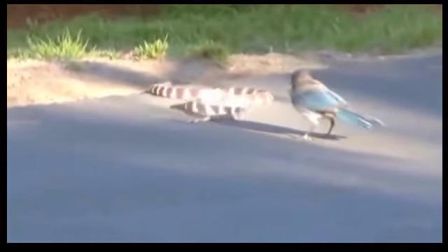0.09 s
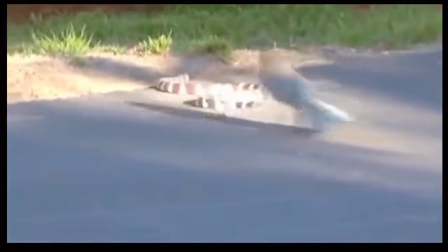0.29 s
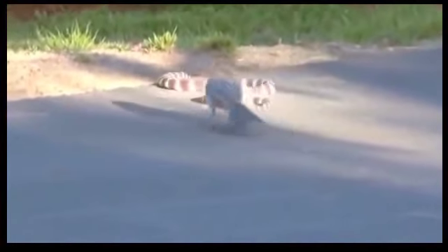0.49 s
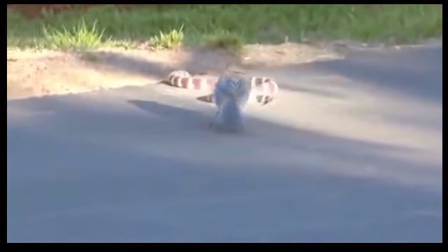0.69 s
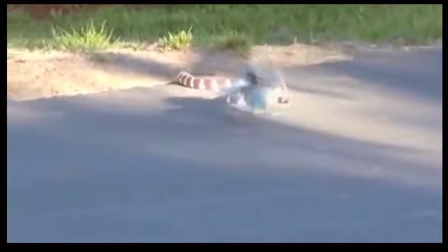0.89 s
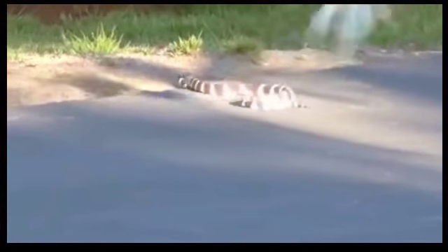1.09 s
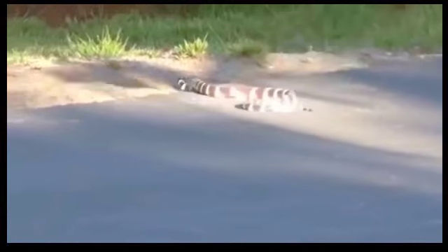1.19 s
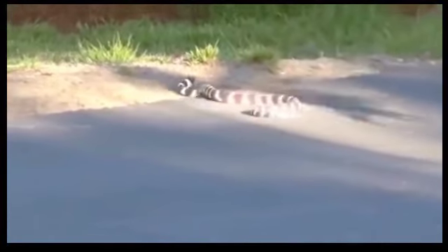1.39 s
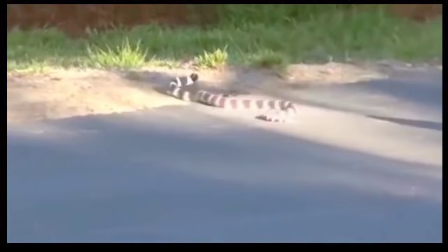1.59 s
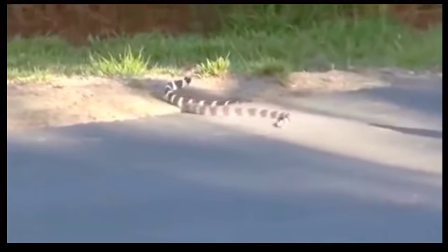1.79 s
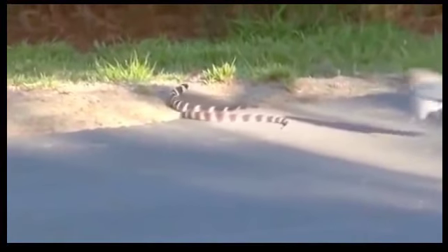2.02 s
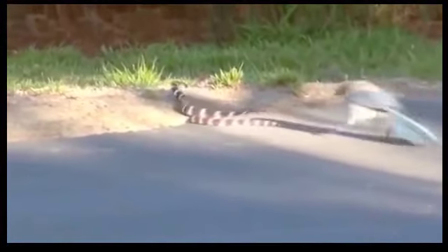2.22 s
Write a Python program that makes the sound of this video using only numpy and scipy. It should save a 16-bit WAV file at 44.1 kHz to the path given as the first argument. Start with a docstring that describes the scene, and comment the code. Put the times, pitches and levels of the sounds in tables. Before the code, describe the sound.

A jay's raspy rising call, twice, with a loud bill click and soft wing beats.

```python
"""A jay mobs a snake on a paved garden path, heard on a stereo microphone over a steady, distant hush.
Its bill snaps once, then a harsh, rising scold comes from a little right of centre, with a second, much
louder snap inside it. Soft wing beats follow as the bird jumps clear, and light air brushes the
microphone. Near the end it scolds again. Each call scatters off the ground nearby and the garden beyond."""
import sys
import numpy as np
from scipy import signal
from scipy.fft import rfft, irfft
from scipy.io import wavfile
from scipy.ndimage import uniform_filter1d

SR = 44100
rng = np.random.default_rng(int(sys.argv[2]) if len(sys.argv) > 2 else 0)


def wav_record(signal):
    """Record a signal, one row per channel, as 16-bit PCM in the file named by sys.argv[1]."""
    frames = np.transpose(np.atleast_2d(signal))
    bounded = np.clip(frames, -1, 1)
    # unit amplitude maps onto the largest positive 16-bit level
    quanta = np.round(bounded * 32767).astype(np.int16)
    wavfile.write(sys.argv[1], SR, quanta)


N = 99225

# Distant air. Each row: frequency in Hz, relative level in dB.
HUSH_COLOUR = [(15, -50), (25, -22), (118, -13.5), (243, -8), (301, -6), (404, -4), (529, -1), (691, 0),
               (1540, -6), (1810, -7.5), (2020, -6.5), (10300, -23.5), (15000, -36.5)]
# The hush across the microphone pair. Each row: frequency in Hz, left minus right in dB.
HUSH_BALANCE = [(60, -13), (200, -12.5), (380, -6), (690, -4), (1280, 5.5), (2350, 4.5), (4330, 4.5),
                (8000, 3.5), (14700, -12)]
# Bill snaps. Each row: start in seconds, gain in dB, left minus right in dB, crack gain in dB,
# gain of the later contacts in dB, tilt of the ring in dB per octave.
BILL_SNAPS = [(0.042, -30.5, 0.5, 2, -11, 2.5), (0.2247, -6, 5.5, -4.5, -1, -1)]
# Contacts within one snap. Each row: delay in seconds, gain in dB.
BILL_CONTACTS = [(0, 2.5), (.0015, 0), (.0029, -3)]
# The ring of a snap. Each row: frequency in Hz, gain in dB, seconds to fall 60 dB.
BILL_MODES = [(1200, -12.5, 0.017), (1932, -4.5, 0.014), (2150, -4, 0.0071), (2510, -1.5, 0.007),
              (2805, -4.5, 0.0085), (3400, -13, 0.0084), (3870, -8, 0.013), (6270, -20, 0.02),
              (6480, -20, 0.012), (8740, -17.5, 0.0059), (10650, -27, 0.015)]
# Tone of a snap at the microphone. Each row: frequency in Hz, gain in dB.
SNAP_COLOUR = [(150, -8), (600, -17), (1000, 1.5), (4200, 0), (11500, -1.5), (12600, -26), (15000, -40)]
# Air on the microphone. Each row: peak time in seconds, half length in seconds, level in dB.
AIR_PUFFS = [(0.123, 0.057, -63.5), (0.301, 0.038, -65), (0.569, 0.055, -71.5), (0.68, 0.095, -65.5),
             (1.063, 0.091, -71), (1.665, 0.048, -71), (1.825, .06, -76)]
# The rumble of that air. Each row: frequency in Hz, relative level in dB.
PUFF_COLOUR = [(20, -33), (50, 3.5), (75, 13), (130, 5), (250, -16), (700, -64), (2000, -97)]
# Downstrokes. Each row: peak time in seconds, level in dB, frequency in Hz,
# rise and decay time in seconds, left minus right in dB.
WING_BEATS = [(.098, -52.5, 150, 0.0016, -18), (.122, -52, 160, 0.0034, -12), (.667, -36, 400, 0.0012, 4),
              (.6724, -37.5, 261, 0.0026, -14.5), (1.015, -55, 243, .003, 8)]
# One list per scold. Each row: time in seconds, pitch in Hz, level in dB, roughness from 0 to 1.
SCOLDS = [
    [(.136, 585, -57.5, 0.82), (.162, 677.5, -42, 0.77), (.195, 897, -39.5, 0.5), (.25, 1108, -40.5, 0.4),
     (.29, 1207, -40, 0.43), (.33, 1236, -39.5, 0.52), (.364, 1395, -38, .45), (.404, 1478, -38.5, 0.22),
     (.428, 1477, -42, 0.11)],
    [(1.735, 633.5, -57.5, 0.77), (1.76, 773.5, -46, 0.8), (1.795, 855.7, -41, .55),
     (1.85, 1120, -38.5, 0.49), (1.89, 1209, -35, 0.42), (1.935, 1247, -35, 0.28), (1.957, 1433, -35, 0.52),
     (1.986, 1493, -38.5, 0.35), (2.006, 1464, -39.5, 0.19)],
]
# Throat resonances at the low start of a scold. Each row: frequency in Hz, relative gain in dB.
THROAT_LOW = [(600, -42), (1250, -19.5), (1550, -7.5), (1850, 0.5), (2400, 5), (3100, -3), (4200, -3),
              (5600, -10.5), (7000, -8.5), (8300, -19), (9400, -49.5), (12500, -42), (15000, -46)]
# The throat at the high end, bill open. Each row: frequency in Hz, relative gain in dB.
THROAT_OPEN = [(600, -44.5), (1400, -26.5), (1950, -9.5), (2450, -17.5), (3050, -5.5), (3650, 4.5),
               (4350, 3), (4950, -8.5), (6200, -15), (7700, -26), (9400, -41.5), (12500, -36),
               (15000, -59.5)]

TOP_HZ = 15000


def undb(db):
    """Decibels to gain."""
    return 10 ** (np.asarray(db) / 20)


def unit(x):
    """Scale to rms 1."""
    return x / np.sqrt(np.mean(x ** 2))


def pan(db):
    """Left and right gains for a level difference."""
    return undb(np.array([[db], [-db]]) / 2)


def colour(x, points):
    """Filter by a curve of (Hz, dB) points."""
    hz, db = np.array(points, float).T
    f = np.maximum(np.fft.rfftfreq(2 * N, 1 / SR), 1)
    gain = undb(np.interp(np.log(f), np.log(np.maximum(hz, 1)), db))
    return irfft(rfft(x, 2 * N) * gain)[..., :N]


def wobble(hz):
    """Random motion slower than hz, spread 1."""
    return unit(signal.sosfilt(signal.butter(2, hz, fs=SR, output="sos"), rng.standard_normal(N)))


def ring(t, t60):
    """Decay that starts at t = 0."""
    return (t >= 0) * np.exp(-np.log(1000) * np.maximum(t, 0) / t60)


def distant_hush():
    """Far-off air wavers slightly, deeper on the right and brighter on the left."""
    shared, level_db, waver_db = 0.27, -57, 0.5  # shared: the part of the power common to both sides
    air = np.sqrt(shared) * rng.standard_normal(N) + np.sqrt(1 - shared) * rng.standard_normal((2, N))
    air = colour(air, HUSH_COLOUR)
    air = np.array([colour(side, [(hz, sign * db / 2) for hz, db in HUSH_BALANCE])
                    for side, sign in zip(air, (1, -1))])
    return air / np.std(air.mean(axis=0)) * undb(level_db + waver_db * wobble(5.6))


def bill_snap(t, start, db, pan_db, crack_db, chatter_db, tilt_db):
    """The bill claps shut in three quick contacts, each a crack and a brief hard ring."""
    clap = 0
    for k, (delay, contact_db) in enumerate(BILL_CONTACTS):
        age = t - start - delay
        modes = 0
        for hz, mode_db, t60 in BILL_MODES:
            gain = undb(mode_db + tilt_db * np.log2(hz / 2300))
            mic_phase = 0.94 * rng.standard_normal((2, 1))  # radians, different on each side
            modes += gain * ring(age, t60) * np.sin(2 * np.pi * hz * age + mic_phase)
        crack = 0.42 * undb(crack_db) * rng.standard_normal((2, N)) * ring(age, t60=0.01)
        attack = np.clip(age / 0.00025, 0, 1)
        clap += undb(contact_db + chatter_db * (k > 0)) * (modes + crack) * attack
    return undb(db) * pan(pan_db) * colour(clap, SNAP_COLOUR)


def scatter(sound, t, t60, db):
    """Dense echoes off the surroundings die away, different on each side of the microphone."""
    response = rng.standard_normal((2, N)) * ring(t - .003, t60)
    return undb(db) * signal.fftconvolve(sound, unit(response) / np.sqrt(N), axes=1)[:, :N]


def air_on_microphone(t):
    """Light puffs rumble against the microphone, mostly on the right."""
    strength = sum(undb(db) * np.exp(-((t - at) / half) ** 2) for at, half, db in AIR_PUFFS)
    rumble = unit(colour(rng.standard_normal((2, N)), PUFF_COLOUR))
    return strength * rumble * pan(-15.5)


def wing_beat(t, at, db, hz, decay_s, pan_db):
    """A downstroke pushes one short, low pulse of air."""
    pulse = np.exp(-np.abs(t - at) / decay_s) * np.cos(2 * np.pi * hz * (t - at))
    return -undb(db) * pan(pan_db) * pulse


def syrinx(hz, rough):
    """One vibrating membrane: jittery pulses, alternately strong and weak, and a rasp on each cycle."""
    hz = hz * (1 + 0.0775 * rough * wobble(445))
    phase = 2 * np.pi * np.cumsum(hz) / SR
    pulses = sum(np.cos(k * phase) * (k * hz < TOP_HZ) for k in range(1, 17)) * np.sqrt(hz / 7000)
    shimmer = 0.59 * rough * wobble(420)
    alternation = 0.31 * rough * np.cos(phase / 2)
    rasp = undb(-5) * rough * rng.standard_normal(N) * (1 + np.cos(phase))
    return pulses * (1 + shimmer + alternation) + rasp


def scold(t, curve):
    """A harsh rising tone shaped by the opening bill; at the top it trills and splits into two voices."""
    times, *columns = np.array(curve).T
    hz, db, rough = (np.interp(t, times, column) for column in columns)
    opening = np.clip((hz - 1034) / (1380 - 1034), 0, 1)  # the bill opens from 1034 to 1380 Hz
    top = np.clip((hz - 1280) / 150, 0, 1)
    trill_hz, fade_s = 83.35, 0.022
    trill = np.sin(2 * np.pi * np.cumsum(trill_hz * (1 + 0.1536 * wobble(42))) / SR)
    hz = hz * (1 + 2 * rough * 0.058 * trill * top)
    # The two sides of the syrinx part at the top: a second, lower voice.
    source = syrinx(hz, rough) + undb(-7) * top * syrinx(hz * 0.9, rough)
    voice = (1 - opening) * colour(source, THROAT_LOW) + opening * colour(source, THROAT_OPEN)
    voice = voice / np.sqrt(uniform_filter1d(voice ** 2, size=1300) + 1e-9)  # even out the loudness
    flutter = 1 + 0.15 * trill
    fade = np.clip(1 + np.minimum(t - times[0], times[-1] - t) / fade_s, 0, 1)
    return voice * undb(db) * flutter * fade


def scene():
    """The jay at the microphone, with quick scatter from the ground and a longer tail from the garden."""
    t = np.arange(N) / SR
    voice = sum(scold(t, curve) for curve in SCOLDS) * pan(-4)
    bill = sum(bill_snap(t, *row) for row in BILL_SNAPS)
    wings = sum(wing_beat(t, *row) for row in WING_BEATS)
    ground = scatter(voice, t, t60=0.24, db=-3)
    ground += colour(scatter(bill, t, t60=0.077, db=-8.5), [(2000, -1.5), (4000, -8.5), (10000, -7)])
    garden = scatter(voice + undb(-31) * bill, t, t60=0.45, db=-8.5)
    garden = colour(garden, [(1500, -11), (3100, 6), (4300, -0.5), (8000, 9)])
    return voice + bill + wings + ground + garden + air_on_microphone(t) + distant_hush()


def record(dry):
    """The recorder clips at full scale and cuts the highest treble."""
    lowpass = signal.ellip(8, .2, 70, TOP_HZ, fs=SR, output="sos")
    return signal.sosfilt(lowpass, np.clip(dry, -1, 1))


dry = scene()
out = record(dry)
wav_record(out)
```